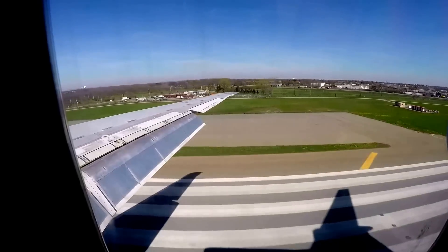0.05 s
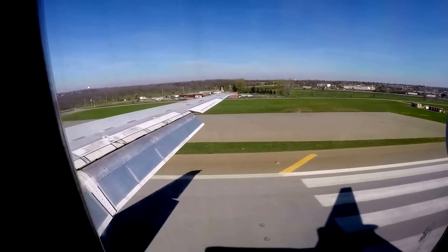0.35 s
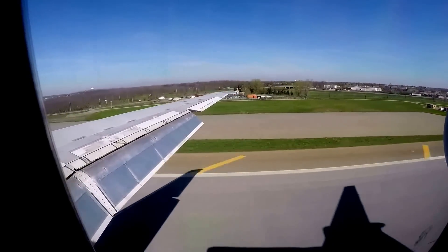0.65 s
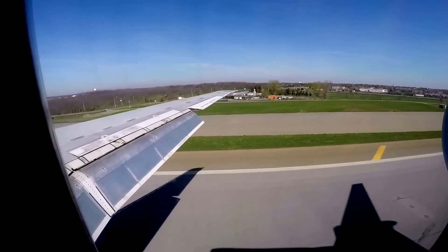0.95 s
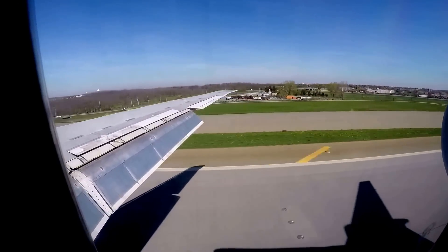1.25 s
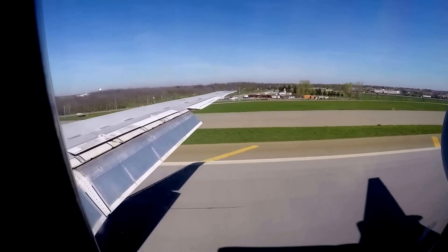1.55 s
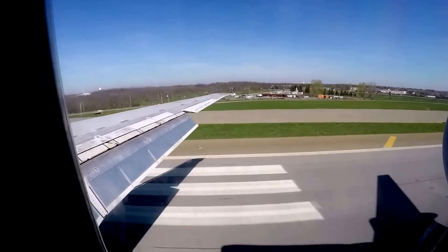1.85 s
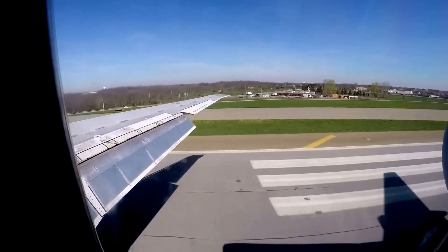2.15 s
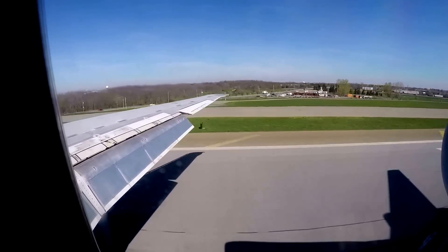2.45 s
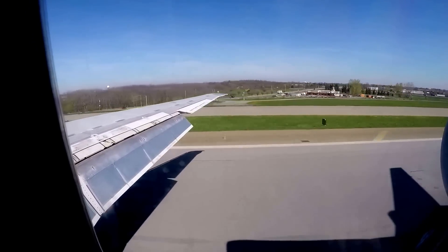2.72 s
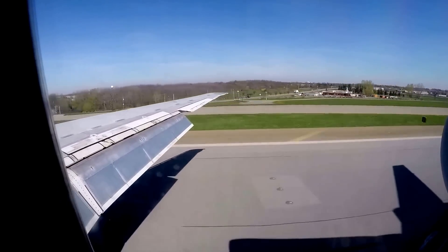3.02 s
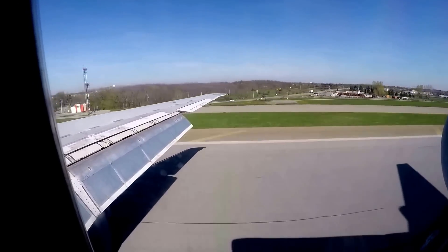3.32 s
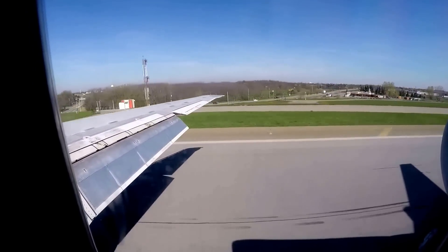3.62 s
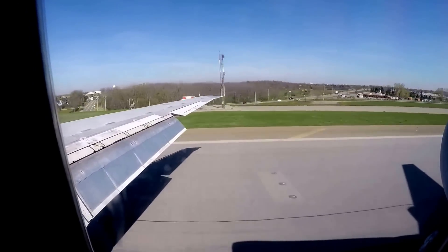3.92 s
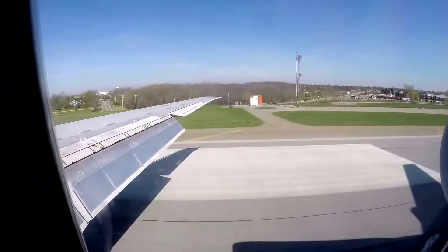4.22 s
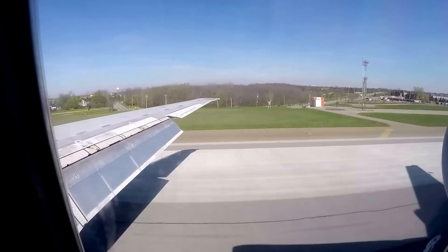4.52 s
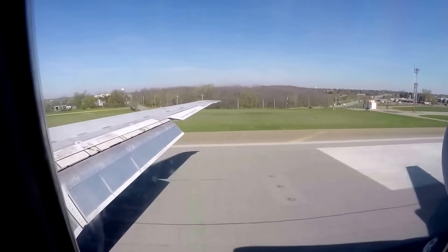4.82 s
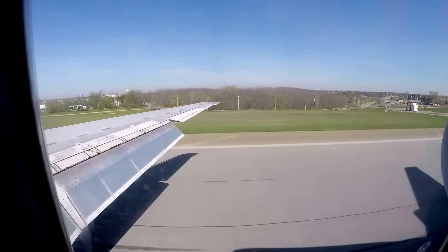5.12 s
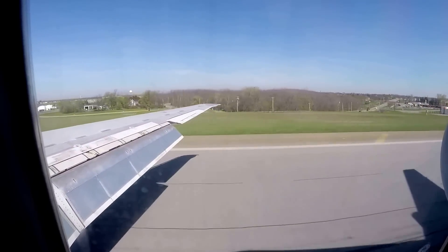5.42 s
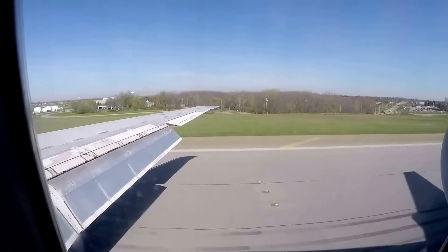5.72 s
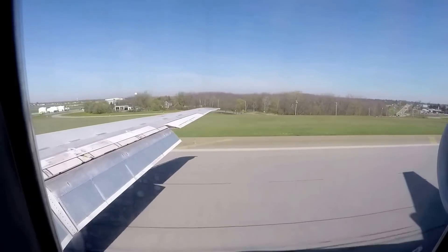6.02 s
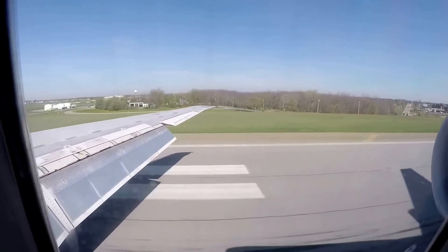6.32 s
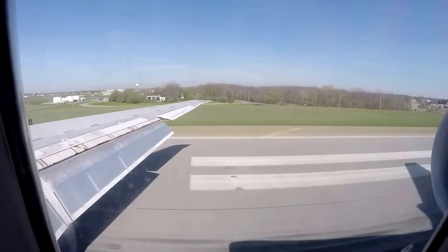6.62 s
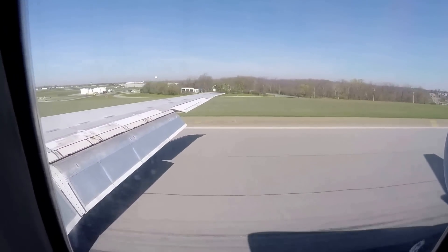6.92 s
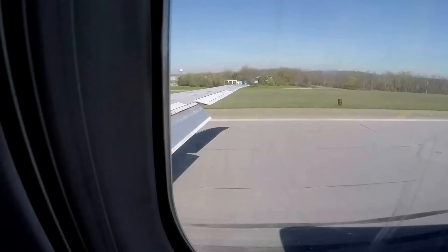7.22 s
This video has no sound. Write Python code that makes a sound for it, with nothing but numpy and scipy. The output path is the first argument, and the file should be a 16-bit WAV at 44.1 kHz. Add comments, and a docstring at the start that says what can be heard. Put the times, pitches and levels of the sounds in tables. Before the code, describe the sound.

A loud cabin rumble as a jet rolls along the runway, its engines winding down with a falling whine and slow, deep throb.

```python
"""Two jet engines spool down as an airliner rolls out after landing, heard from a window seat.
Their unbalanced shafts turn at slightly different speeds and beat; their blade rows whine ever lower.
Tyres rumble and ring the floor, air roars along the hull, loose trim ticks. Near the end the camera
knocks on the window, lifts away and slides along the frame. Its limiter ducks the bass under each throb."""
import sys
import numpy as np
from scipy import signal
from scipy.io import wavfile
from scipy.ndimage import uniform_filter1d

SR = 44100
rng = np.random.default_rng(int(sys.argv[2]) if len(sys.argv) > 2 else 0)


def unload_wav(signal):
    """Save mono or channel-first audio to the path in sys.argv[1] as 16-bit WAV at rate SR, clipped to [-1, 1]."""
    wavfile.write(
        sys.argv[1],
        SR,
        np.round(np.clip(np.atleast_2d(signal).T, -1, 1) * 32767).astype(np.int16),
    )


N = 328986
TIME_S = np.arange(N) / SR

# Noise spectra: freq_hz, relative_density_db
HAND_SPECTRUM = [(20, 1), (60, -4), (90, 6), (125, 9), (175, -26), (260, -1.5), (400, -35), (520, -39)]
LIGHT_TICK_SPECTRUM = [(2000, -10), (3500, 13), (6000, -1), (10000, 9), (15000, -1)]
FIRM_TICK_SPECTRUM = [(900, 3), (2000, -4), (3600, 0), (5000, -3), (8000, -17), (13000, -27)]
ROAR_SPECTRUM = [(250, 7.5), (400, 2), (520, 6), (640, 0), (850, -2.5), (1100, -10.5), (1400, -6.5),
                 (1900, -10), (2600, -12), (3300, -12), (4200, -24.5), (6000, -46)]
HISS_SPECTRUM = [(2500, -4), (3600, -23), (4400, 1.5), (5200, -1), (6000, 0.5), (7000, -4.5), (8500, -8),
                 (10500, -15), (13000, -15.5), (15000, -23.5)]
TYRE_SPECTRUM = [(15, -5.5), (25, 5.5), (38, 2.5), (55, 4.5), (80, 1), (105, 3), (150, 0), (190, -8),
                 (260, -4.5), (330, -15.5), (410, -16), (480, -34), (700, -46.5)]
# Loose trim and touches on the camera: start_s, relative_db, t60_s, brightness (0-1)
TICKS = [(.36, -50, .15, .9), (.505, -46, .2, .8), (.532, -44, .2, .8), (1.490, -43, .09, .95),
         (1.52, -52, .2, 1), (2.841, -50, .12, .9), (3.174, -53, .2, 1), (3.187, -52, .15, .95),
         (3.25, -53, .08, 1), (5.808, -46, .12, .7), (5.843, -53, .2, .9), (7.019, -38, .15, .16),
         (7.100, -28, .02, .02), (7.157, -49, .15, 1), (7.195, -48, .15, .95), (7.258, -46, .13, .9),
         (7.295, -46.5, .15, 1), (7.352, -46, .12, .9), (7.368, -48, .08, .8), (7.42, -50, .15, 1)]
# Camera contacts with the window: start_s, relative_db, ring_re_contact_db
KNOCKS = [(6.978, -58, -13), (6.985, -49, -10), (6.995, -45, -16), (7.007, -50, -23), (7.021, -54, -28)]
# Camera case modes: freq_hz, gain_db, t60_s
CASE_MODES = [(7420, -3, .04), (9600, -3, .02), (12700, -9, .015), (14870, -5, .012)]
# Airflow along the hull: time_s, relative_db
AIRFLOW = [(0.08, -38), (0.21, -37), (0.48, -38.5), (0.5, -36.5), (1.45, -40.5), (1.54, -39.5),
           (1.88, -42.5), (2.02, -42), (2.49, -46), (2.79, -42.5), (3.46, -47), (3.99, -43), (4.35, -49.5),
           (6.75, -44), (6.9, -45)]
# Cabin panel modes: freq_hz, width_hz, level_re_roar_db
PANEL_MODES = [(407, 33, -8.5), (869, 140, -9), (1145, 37, -15.5), (1351, 63, -15)]
# Tyre rumble and floor ring: time_s, level_db
TYRE_LEVEL = [(0, -18), (.7, -17), (1.5, -19.5), (2.2, -24), (2.55, -24), (2.85, -18.5), (3.4, -22),
              (4, -24.5), (4.5, -25.5), (5, -22.5), (7.46, -23.5)]
FLOOR_LEVEL = [(0, -48), (2.1, -50), (2.65, -47), (2.9, -40), (3.2, -42), (3.35, -49), (3.9, -44),
               (4.5, -50), (5.3, -46), (6.5, -46), (7.46, -50)]
# Engine accessory hum: time_s, pitch_hz, relative_db
ACCESSORY_HUM = [(0, 428, -30), (.07, 424, -30), (.15, 416, -43), (.3, 405, -43), (.45, 401, -36),
                 (.65, 395, -36), (1.15, 391, -35), (1.35, 388, -40), (1.5, 386, -39), (1.7, 385, -42),
                 (2.2, 382, -46), (3, 378, -39.5), (3.35, 376, -46), (3.6, 375, -41), (4, 373, -45),
                 (5.5, 368, -45), (6.3, 366, -45), (6.65, 365, -40), (6.85, 365, -46), (7.3, 364, -48),
                 (7.46, 364, -39)]
# Weak blade tones and sum tones: shaft_order, high_speed_db, mid_speed_db, low_speed_db, idle_db
LEFT_ORDERS = [(34, -58, -72, -76, -72), (56, -60, -68, -71, -66), (62, -72, -74, -81, -73),
               (66, -59, -63, -73, -72), (68, -62, -69, -77, -74), (86, -60, -76, -82, -82),
               (90, -61, -76, -76, -71), (96, -72, -67, -80, -77), (100, -68, -66, -67, -70),
               (102, -69, -70, -72, -66), (116, -65, -79, -81, -75), (130, -73, -72, -73, -67),
               (136, -82, -81, -81, -75), (144, -90, -90, -85, -80), (146, -86, -80, -85, -79),
               (164, -83, -79, -80, -80), (170, -88, -89, -81, -81), (178, -92, -92, -84, -86)]
RIGHT_ORDERS = [(48, -59, -62, -66, -65), (56, -64, -64, -69, -74), (62, -70, -76, -81, -77),
                (66, -71, -68, -74, -78), (68, -65, -68, -74, -80), (82, -62, -63, -65, -66),
                (100, -73, -72, -78, -77)]
# Leading blade tones at the seat: time_s, relative_db
HIGH_WHINE = [(0, -51), (.12, -56), (.26, -54), (.37, -50), (.44, -59), (.53, -50), (.6, -56), (.7, -62),
              (.78, -51), (.85, -52), (.9, -46.5), (.94, -50), (1.03, -47.5), (1.1, -59), (1.14, -46.5),
              (1.31, -56), (1.5, -50), (1.68, -46.5), (1.83, -43.5), (1.91, -51), (1.96, -42.5),
              (2.05, -44), (2.09, -51), (2.15, -49), (2.22, -58), (2.28, -45.5), (2.36, -49.5),
              (2.44, -46.5), (2.55, -53), (2.67, -59), (2.85, -56), (2.96, -62), (3.22, -56), (3.4, -57.5),
              (3.63, -51.5), (4.1, -55), (4.55, -59.5), (5.1, -54), (5.45, -56), (5.56, -67), (5.72, -61),
              (5.76, -53.5), (5.85, -57), (5.96, -50.5), (6.12, -54.5), (6.19, -48.5), (6.33, -59),
              (6.48, -46), (6.57, -56.5), (6.69, -47.5), (6.79, -57), (6.82, -51.5), (6.91, -60),
              (7.03, -50), (7.1, -63), (7.22, -52), (7.28, -62), (7.31, -50.5), (7.35, -61), (7.46, -58)]
MID_WHINE = [(0, -56), (.38, -62), (.55, -49.5), (1, -53), (1.15, -59), (1.55, -51.5), (1.85, -66),
             (2.7, -58), (2.82, -66), (3.8, -51.5), (4.05, -53), (4.6, -63), (5.4, -61), (5.53, -54),
             (5.65, -59), (5.98, -54), (6.1, -67), (6.25, -54), (6.55, -57), (6.75, -54), (7, -60),
             (7.2, -54), (7.46, -60)]
LOW_WHINE = [(0, -55), (.48, -47), (.75, -67), (1.1, -56.5), (1.38, -56.5), (1.5, -48.5), (1.59, -45),
             (1.7, -51), (1.85, -61), (2.05, -67), (2.35, -57), (3.2, -58), (4, -59.5), (4.6, -68),
             (5.4, -66), (6.5, -61), (7.46, -61)]
# Turbulent flutter of those tones: time_s, depth (0-1)
FLUTTER = [(0, .25), (2, .15), (3.2, .25), (3.8, .38), (4.2, .34), (4.6, .2), (7.46, .24)]
# Lowest cabin resonance: freq_hz, width_hz, gain_db
CABIN_BOOM = [(58.15, 6.1, -14)]

SHAFT_STEPS_HZ = (64, 57.5, 55.3, 54.5)   # high, mid, low, idle
IN_PHASE_S = 2.2
LIFT_START_S, LIFT_DURATION_S = 7.02, 0.16
LIFT_THROB_DB, LIFT_AIRBORNE_DB = -6, -3


def from_db(db):
    """Decibels to gain."""
    return 10 ** (np.asarray(db) / 20)


def unit_rms(x):
    """Scale to rms 1."""
    return x / np.sqrt(np.mean(x ** 2) + 1e-20)


def curves(rows):
    """Columns of a time table, interpolated per sample."""
    time_s, *columns = np.transpose(rows)
    return [np.interp(TIME_S, time_s, column) for column in columns]


def drift(rate_hz):
    """Smooth random wander, rms 1."""
    hop, settle = 40, 2000
    pole = np.exp(-2 * np.pi * rate_hz * hop / SR)
    white = rng.standard_normal(N // hop + settle + 2)
    slow = signal.lfilter([1], [1, -2 * pole, pole * pole], white)[settle:]
    return np.interp(np.arange(N) / hop, np.arange(len(slow)), unit_rms(slow))


def banded_noise(spectrum, swell_db, swell_hz):
    """Third-octave noise bands, each swelling independently; rms 1."""
    freq_hz, density_db = np.transpose(spectrum)
    edges_hz = 2 ** np.arange(4, 14.2, 1 / 3)
    white, out = rng.standard_normal((2, N + SR)), 0
    for k, (low, high) in enumerate(zip(edges_hz, edges_hz[1:])):
        if high > freq_hz[0] and low < freq_hz[-1]:
            bandpass = signal.butter(2, [low, high], "band", fs=SR, output="sos")
            band = signal.sosfilt(bandpass, white[k % 2])[SR:]
            level_db = np.interp(np.log(low * high) / 2, np.log(freq_hz), density_db)
            out = out + band * from_db(level_db + swell_db * drift(swell_hz))
    return unit_rms(out)


def resonant_noise(freq_hz, width_hz):
    """Noise through one resonance; rms 1."""
    edges_hz = [freq_hz - width_hz / 2, freq_hz + width_hz / 2]
    bandpass = signal.butter(1, edges_hz, "band", fs=SR, output="sos")
    return unit_rms(signal.sosfilt(bandpass, rng.standard_normal(N)))


def ring(force, freq_hz, t60_s):
    """Damped mode: a unit impulse starts a unit sine."""
    radius, step_rad = from_db(-60 / (t60_s * SR)), 2 * np.pi * freq_hz / SR
    feedback = [1, -2 * radius * np.cos(step_rad), radius ** 2]
    return signal.lfilter([0, np.sin(step_rad)], feedback, force + 1e-18)


def phase_rad(freq_hz):
    """Rotor angle, zero at IN_PHASE_S, where both unbalances pull together."""
    turns = np.cumsum(freq_hz) / SR
    return 2 * np.pi * (turns - turns[round(IN_PHASE_S * SR)])


def rough_tone(angle_rad, scatter, waver_hz):
    """Tone partly scattered by turbulence; rms 1."""
    in_phase = (1 + scatter * drift(waver_hz)) * np.cos(angle_rad)
    quadrature = scatter * drift(waver_hz) * np.sin(angle_rad)
    return unit_rms(in_phase + quadrature)


def lift_gain(final_db):
    """Pickup falls as the camera leaves the window."""
    return from_db(final_db * np.clip((TIME_S - LIFT_START_S) / LIFT_DURATION_S, 0, 1))


def stick_slip(slips_per_s, spread_db, share):
    """Envelope of plastic catching and slipping in random 1 ms bursts; rms 1."""
    sizes = from_db(spread_db * np.minimum(rng.exponential(1, N), 4))
    slips = sizes * (rng.random(N) < slips_per_s / SR)
    bursts = signal.lfilter([1], [1, -np.exp(-1000 / SR)], slips + 1e-18)
    return unit_rms(1 - share + share * unit_rms(bursts))


def plastic_ticks(attack_s, gain_db):
    """Short gritty rubs of plastic on plastic; firmer touches sound lower."""
    bright, dull = np.zeros((2, N))
    for start_s, level_db, t60_s, brightness in TICKS:
        start = round(start_s * SR)
        age_s = TIME_S[:N - start]
        envelope = from_db(level_db - 60 * age_s / t60_s) * (1 - np.exp(-age_s / attack_s))
        bright[start:] += brightness * envelope
        dull[start:] += 2 * (1 - brightness) * envelope
    light = banded_noise(LIGHT_TICK_SPECTRUM, swell_db=1.5, swell_hz=66)
    firm = banded_noise(FIRM_TICK_SPECTRUM, swell_db=2, swell_hz=86)
    grit = stick_slip(slips_per_s=900, spread_db=3, share=0.5)
    return from_db(gain_db) * grit * (bright * light + dull * firm)


def window_knock(scuff_s, clack_gain_db, thump_gain_db):
    """Each contact scuffs the case, rings it and rocks the camera."""
    scuff, strike, push = np.zeros((3, N))
    for start_s, level_db, ring_db in KNOCKS:
        start = round(start_s * SR)
        contact = from_db(level_db) * np.exp(-TIME_S[:N - start] / scuff_s)
        scuff[start:] += contact
        strike[start:] += from_db(ring_db) * contact
        push[start] = from_db(level_db)
    grit = strike * rng.standard_normal(N)
    case = sum(from_db(gain_db) * ring(grit, freq_hz, t60_s) for freq_hz, gain_db, t60_s in CASE_MODES)
    clack = scuff * resonant_noise(freq_hz=3300, width_hz=3600)
    highpass = signal.butter(2, 35, "high", fs=SR, output="sos")
    thump = signal.sosfilt(highpass, ring(push, freq_hz=57, t60_s=0.13))
    return case + from_db(clack_gain_db) * clack + from_db(thump_gain_db) * thump


def hand_slide(start_s, attack_s, level_db):
    """Fingers slide the camera along the frame: dull rumble, fine rustle."""
    envelope = from_db(level_db) * np.clip((TIME_S - start_s) / attack_s, 0, 1)
    rustle = from_db(-49 + 3.2 * drift(76)) * resonant_noise(freq_hz=10000, width_hz=8200)
    rumble = banded_noise(HAND_SPECTRUM, swell_db=-1, swell_hz=16)
    return envelope * (rumble + rustle)


def hull_air(roar_gain_db, gust_db, hiss_db):
    """Airflow roars and rings the cabin panels; hiss follows the flow."""
    flow_db, = curves(AIRFLOW)
    panels = sum(from_db(db) * resonant_noise(hz, width_hz) for hz, width_hz, db in PANEL_MODES)
    roar_gain = from_db(flow_db + roar_gain_db + gust_db * drift(29)) * lift_gain(LIFT_AIRBORNE_DB)
    roar = banded_noise(ROAR_SPECTRUM, swell_db=0.7, swell_hz=15)
    hiss_gain = from_db(hiss_db + flow_db - flow_db.mean())
    hiss = banded_noise(HISS_SPECTRUM, swell_db=1.5, swell_hz=9.7)
    return roar_gain * (roar + panels) + hiss_gain * hiss


def wheels():
    """Tyres rumble on the runway and ring one floor mode."""
    tyre_db, = curves(TYRE_LEVEL)
    floor_db, = curves(FLOOR_LEVEL)
    rumble = from_db(tyre_db) * banded_noise(TYRE_SPECTRUM, swell_db=1, swell_hz=4.5)
    floor = from_db(floor_db) * resonant_noise(freq_hz=421, width_hz=10)
    return rumble + floor


def accessory_hum(gain_db):
    """Engine accessories hum at a falling pitch."""
    pitch_hz, level_db = curves(ACCESSORY_HUM)
    return from_db(level_db + gain_db) * rough_tone(phase_rad(pitch_hz), scatter=0.15, waver_hz=9.2)


def transmission_db(shaft_hz, levels_db):
    """Blade tone level in the cabin, interpolated over SHAFT_STEPS_HZ."""
    return np.interp(shaft_hz, SHAFT_STEPS_HZ[::-1], levels_db[::-1])


def turbine_whistle(shaft_hz, order, width_hz, levels_db):
    """Exhaust turbulence smears one turbine tone into a gliding noise band."""
    angle_rad = order * phase_rad(shaft_hz)
    band = drift(width_hz) * np.cos(angle_rad) + drift(width_hz) * np.sin(angle_rad)
    return from_db(transmission_db(shaft_hz, levels_db)) * band


def weak_blades(shaft_hz, orders, fade_hz, fade_db=1):
    """Faint wavering blade tones; each carries best at certain shaft speeds."""
    angle_rad, out = phase_rad(shaft_hz), 0
    for order, *levels_db in orders:
        level_db = transmission_db(shaft_hz, levels_db) + fade_db * drift(fade_hz)
        out = out + from_db(level_db) * rough_tone(order * angle_rad, scatter=0.32, waver_hz=20)
    return out


def blade_tone(pitch_hz, swell, gain_db, scatter, waver_hz):
    """Swelling blade-passing tone; turbulent flutter adds a breathy skirt."""
    level_db, = curves(swell)
    depth, = curves(FLUTTER)
    flutter = 1 + depth * drift(rate_hz=130)
    return from_db(level_db + gain_db) * flutter * rough_tone(phase_rad(pitch_hz), scatter, waver_hz)


def leading_blades(left_hz, right_hz):
    """Three rows lead the whine, each at blade count times shaft speed."""
    high = blade_tone(82 * left_hz, HIGH_WHINE, gain_db=-0.56, scatter=0.13, waver_hz=22)
    mid = blade_tone(48 * left_hz, MID_WHINE, gain_db=0.5, scatter=0.24, waver_hz=46)
    low = blade_tone(34 * right_hz, LOW_WHINE, gain_db=0.1, scatter=0.25, waver_hz=22)
    return high + mid + low


def shaft_throb(shaft_hz, second_db, third_db):
    """Once-a-turn unbalance plus two harmonics; peaks as the shaft slows through the cabin boom."""
    angle_rad = phase_rad(shaft_hz)
    harmonics = from_db(second_db) * np.sin(2 * angle_rad) + from_db(third_db) * np.cos(3 * angle_rad)
    boom = sum(from_db(db) / (1 + 2j * (shaft_hz - hz) / width_hz) for hz, width_hz, db in CABIN_BOOM)
    return np.sqrt(2) * np.abs(boom) * (np.cos(angle_rad) + harmonics)


def coast_hz(idle_hz, excess_hz, decay_s, shape):
    """Speed of a low-pressure shaft coasting to idle."""
    return idle_hz + excess_hz * np.exp(-(TIME_S / decay_s) ** shape)


def engines():
    """Both engines spool down; their beat slows as the speeds converge."""
    left_hz = coast_hz(idle_hz=53.872, excess_hz=16.631, decay_s=2.0, shape=1.04)
    right_hz = coast_hz(idle_hz=53.774, excess_hz=20.628, decay_s=2.108, shape=1.12)
    throb = shaft_throb(left_hz, second_db=-20.5, third_db=-42)
    throb += from_db(-3.5) * shaft_throb(right_hz, second_db=-28.5, third_db=-33)
    faint = weak_blades(left_hz, LEFT_ORDERS, fade_hz=5.1)
    faint += weak_blades(right_hz, RIGHT_ORDERS, fade_hz=2.6)
    whine = leading_blades(left_hz, right_hz)
    whistle = turbine_whistle(left_hz, order=101, width_hz=90, levels_db=(-72, -62, -73, -68))
    return lift_gain(LIFT_THROB_DB) * throb + whine + lift_gain(LIFT_AIRBORNE_DB) * (faint + whistle)


def scene():
    """Mono sum at the seat."""
    ticks = plastic_ticks(attack_s=0.0015, gain_db=-8.5)
    knock = window_knock(scuff_s=0.0058, clack_gain_db=3, thump_gain_db=42)
    aircraft = engines() + accessory_hum(gain_db=1) + wheels()
    air = hull_air(roar_gain_db=2, gust_db=0.05, hiss_db=-56)
    hand = hand_slide(start_s=7.19, attack_s=0.047, level_db=-20.5)
    return (ticks + knock + hand + air + aircraft)[None]


def limiter(x, ceiling_db, release_db_per_s, window_s, attack_s):
    """Rms limiter: fast attack, slow release."""
    level_db = 10 * np.log10(uniform_filter1d(x ** 2, int(window_s * SR)) + 1e-12)
    over_db = np.maximum(level_db - ceiling_db, 0)
    release_db = release_db_per_s * TIME_S
    held_db = np.maximum.accumulate(over_db + release_db, axis=-1) - release_db
    pole = np.exp(-1 / (attack_s * SR))
    return x * from_db(-signal.lfilter([1 - pole], [1, -pole], held_db))


def record(dry):
    """The camera limits only the bass, ducking the rumble under each throb, and cuts the top."""
    crossover_hz, cutoff_hz = 420, 15200
    bass = signal.sosfiltfilt(signal.butter(2, crossover_hz, fs=SR, output="sos"), dry)
    limited = limiter(bass, ceiling_db=-17, release_db_per_s=14, window_s=0.02, attack_s=0.027)
    lowpass = signal.ellip(10, 0.1, 80, cutoff_hz, fs=SR, output="sos")
    return signal.sosfilt(lowpass, dry - bass + limited)


dry = scene()
out = record(dry)
unload_wav(out)
```